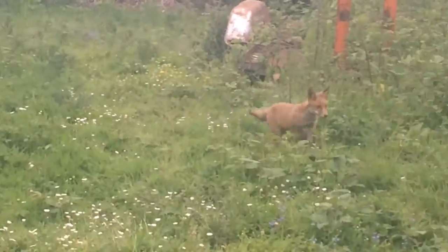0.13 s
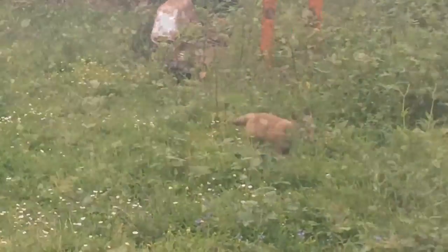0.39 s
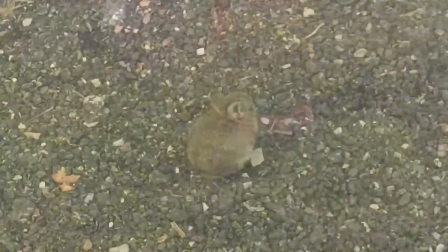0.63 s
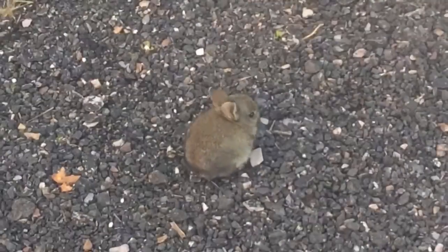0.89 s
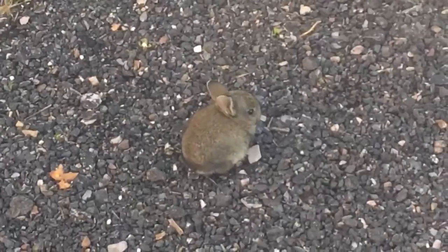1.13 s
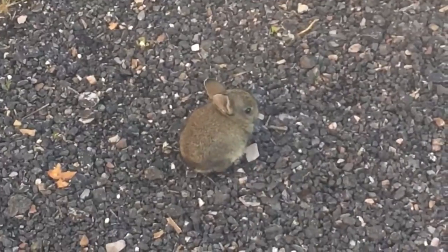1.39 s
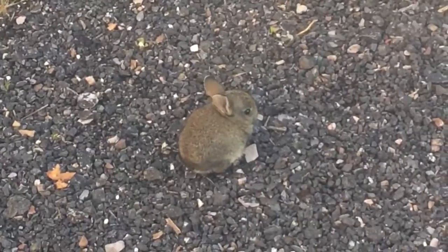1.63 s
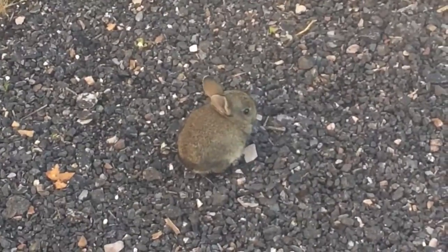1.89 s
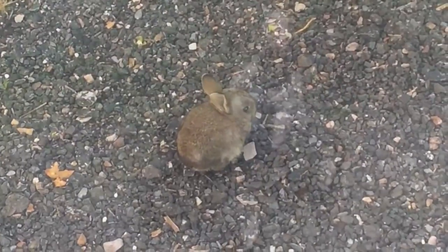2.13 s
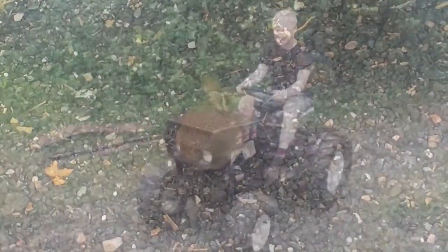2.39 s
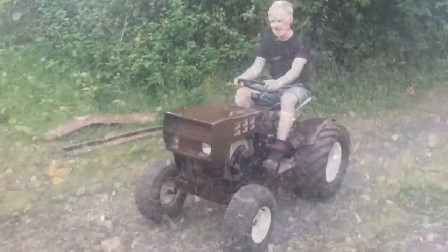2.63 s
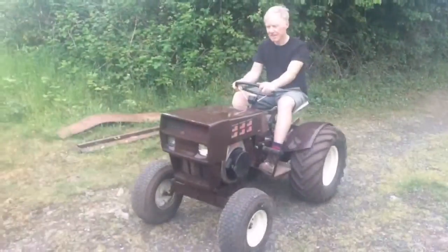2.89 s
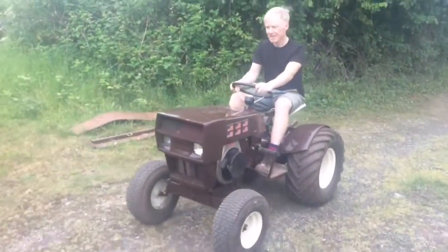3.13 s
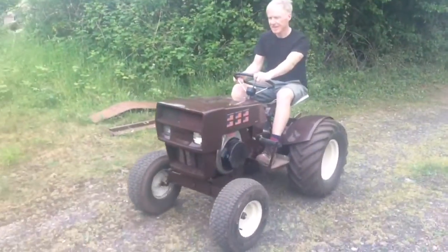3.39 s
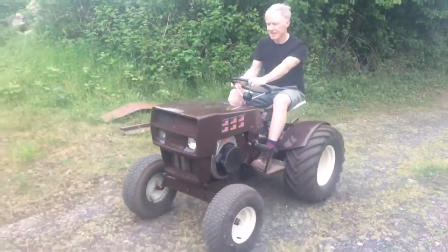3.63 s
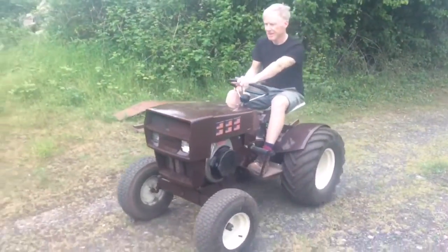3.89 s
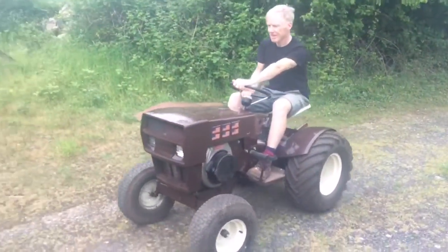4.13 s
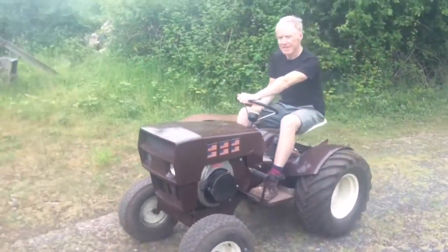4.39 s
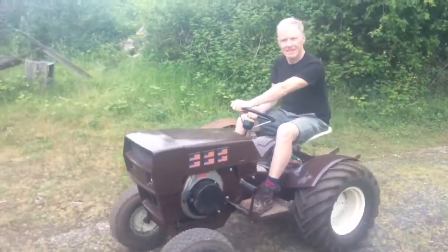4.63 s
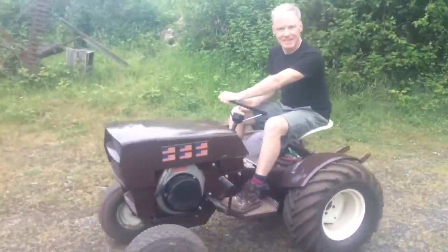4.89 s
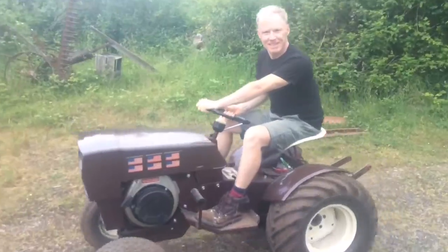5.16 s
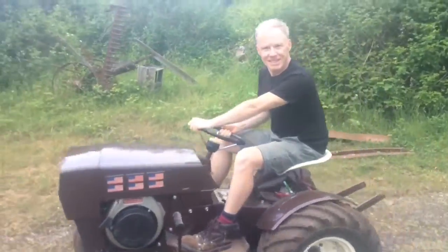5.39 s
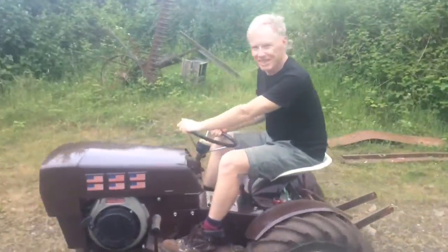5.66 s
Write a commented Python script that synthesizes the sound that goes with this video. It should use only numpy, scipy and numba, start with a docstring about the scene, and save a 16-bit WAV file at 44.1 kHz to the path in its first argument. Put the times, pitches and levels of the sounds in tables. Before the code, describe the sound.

First soft steps rub grass under faint wind, then a calmer yard with birds whistling and a camera motor ticking in threes. Suddenly, at two seconds, a much louder small diesel tractor takes over with steady rapid knocks, low exhaust pulses, chattering gears and loose steel jingles. Stones crack under a tyre and a panel clangs late. Close outdoor phone pickup, dry.

```python
"""Steps scuff the grass of a quiet garden over wind and far hiss, birds whistle, a lens motor ticks in threes.
Then a hard cut to a one-cylinder diesel garden tractor rolling past a few metres away: each firing knocks
the block, gas puffs ring the exhaust pipe, valve gear and timing gears clatter, a loose steel pin jingles,
stones crack under a tyre and a sheet panel clangs. Most sounds are clicks or noise bursts ringing
resonances; the whistles are bending sines."""
import sys
import numpy as np
from scipy import signal
from scipy.fft import rfft, irfft
from scipy.io import wavfile
from scipy.ndimage import uniform_filter1d
from numba import njit

SR = 44100
rng = np.random.default_rng(int(sys.argv[2]) if len(sys.argv) > 2 else 0)


def transcribe(u):
    """Save the signal u as a 16-bit wav file named by the first command-line argument.

    u: samples, shape (n,) or (channels, n), limited to [-1, 1]; the rate is SR.
    q: integer samples, one column per channel.
    """
    v = np.clip(np.atleast_2d(u).T, -1, 1)
    q = np.round(v * 32767).astype(np.int16)
    wavfile.write(sys.argv[1], SR, q)


def invert_db(level):
    """Linear amplitude ratio for a level in decibels (20 dB per decade), elementwise."""
    return 10 ** (np.asarray(level, dtype=float) / 20)


N = 254456
T = np.arange(N) / SR

HISS_CHANGE_S = 0.876  # the far hiss changes colour and drops
CUT_S = 1.976  # the tractor cuts in
SKIP_S, SKIPPED_S = 5.044, 0.02304  # a second cut jumps over a third of one engine cycle
FIRST_FIRING_S, CYCLE_S = 1.9906, 0.07  # nominal cycle length


def unit(x):
    """Scale to rms 1."""
    return x / np.sqrt(np.mean(x ** 2))


def curve(rows):
    """Interpolate the columns of (seconds, ..) rows, one value a sample."""
    s, *columns = np.transpose(rows)
    return [np.interp(T, s, column) for column in columns]


@njit
def svf(x, hz, width):
    """State-variable band-pass with gain 1 at its centre, which may move."""
    y, band, low = np.empty(len(x)), 0., 0.
    for i in range(len(x)):
        g, k = np.tan(np.pi * hz[i] / SR), width / hz[i]
        v = (band + g * (x[i] - low)) / (1 + g * (g + k))
        band, low, y[i] = 2 * v - band, low + 2 * g * v, k * v
    return y


def ring(x, hz, width):
    """One resonance at a fixed pitch; a wider one dies away faster."""
    return svf(x + 1e-18, hz * np.ones(N), 1. * width)


def modes(x, table):
    """Sum of resonances of alternating sign from (Hz, width in Hz, dB) rows."""
    return sum((-1) ** k * invert_db(db) * ring(x, hz, width) for k, (hz, width, db) in enumerate(table))


def low_pass(x, order, hz):
    """Butterworth low-pass."""
    return signal.sosfilt(signal.butter(order, hz, fs=SR, output="sos"), x)


def clicks(s, size):
    """One-sample pushes at times s."""
    i = np.round(np.asarray(s) * SR).astype(int)
    inside = (i >= 0) & (i < N)
    return np.bincount(i[inside], (size * np.ones(len(i)))[inside], N)


def bursts(s, size, tail_s):
    """Envelope that jumps at each time and dies away exponentially."""
    return signal.lfilter([1], [1, -np.exp(-1 / (tail_s * SR))], clicks(s, size))


def colour(x, table):
    """Shape a spectrum by (Hz, dB) points on a log frequency axis; rms 1."""
    hz, db = np.transpose(table)
    bins = np.arange(N // 2 + 1) * SR / N + 1
    gain = invert_db(np.interp(np.log(bins), np.log(hz), db))
    return unit(irfft(rfft(x) * gain, N))


def walk(rate):
    """Random levels held 1 / rate s and slewed; spread near 1."""
    k = int(SR / rate)
    held = np.repeat(rng.standard_normal(N // k + 1), k)
    return 1.6 * uniform_filter1d(uniform_filter1d(held, k), k)[:N]


def wind():
    """Wind on the microphone: low band-passed noise whose level wanders."""
    # Each row: time in seconds, mean rumble level in dB.
    rumble_rows = [(0.0, -56), (0.06, -58), (0.136, -51), (0.18, -59.5), (0.45, -54.5), (0.56, -55),
                   (0.644, -55), (0.7, -63.5), (1.2, -69), (1.96, -64)]
    rumble = unit(ring(ring(rng.standard_normal(N), 70, 82), 67, 94))
    return rumble * invert_db(curve(rumble_rows)[0] + 2.1 * walk(25.37))


def hiss():
    """Far hiss: steady noise that changes colour and drops a little at HISS_CHANGE_S."""
    # Spectra of the hiss before and after the change. Each row: frequency in Hz, relative level per Hz in dB.
    earlier_spectrum = [(120, -29), (200, 1), (1200, -6), (1630, -5), (2100, -8.5), (3610, -11), (4100, -13),
                        (7180, -10.5), (15100, -27.5)]
    later_spectrum = [(120, -48), (200, -10), (267, -7), (303, -10), (614, -7), (709, -13), (749, -8.5),
                      (2100, -14), (3420, -13.5), (4650, -23), (6210, -12.5), (15100, -29.5)]
    air = rng.standard_normal(N)
    earlier = colour(air, earlier_spectrum) * invert_db(-63.5)
    later = colour(air, later_spectrum) * invert_db(-67.5)
    return np.where(T < HISS_CHANGE_S, earlier, later)


def scuffs(rise_s=0.005, fall_s=0.0046):
    """Steps rub the grass: sparse grit rings hollow resonances under short swells."""
    # Hollow tone of the scuffs. Each row: frequency in Hz, width in Hz, relative level in dB.
    grass_modes = [(411, 23, 9), (733, 99, 6), (1077, 50, -1), (1490, 170, -2), (1800, 140, -5)]
    # Rubs of the foot. Each row: start in seconds, length in seconds, level in dB.
    rubs = [(0.02, 0.029, -54), (0.111, 0.028, -45.5), (.224, 0.023, -51.5), (0.266, .027, -52.5),
            (.314, .015, -52.5), (.355, .05, -58.5), (0.487, 0.0062, -42), (0.512, 0.015, -55),
            (.575, .015, -74)]
    grit = (rng.random(N) < 0.15) * rng.standard_normal(N)
    rustle = unit(modes(grit, grass_modes) + 0.37 * ring(ring(grit, 1060, 1500), 770, 1600))
    swell = 0
    for start, length, db in rubs:
        slope = np.minimum((T - start) / rise_s, (start + length - T) / fall_s)
        swell = swell + invert_db(db) * np.exp(np.minimum(0, slope))
    return rustle * swell


def lens_motor(step_rate=30):
    """Each motor step gives three clicks that ring a small housing, softer before the hiss changes."""
    # Clicks of one motor step. Each row: delay in seconds, mean push in dB after the hiss changes.
    step_ticks = [(.0020, -32), (0.012, -28), (0.018, -49)]
    steps = np.arange(60) / step_rate
    chance_db = 0.9 * rng.standard_normal((len(steps), len(step_ticks)))
    softer_db = 4.4 * (steps < HISS_CHANGE_S)
    ticks = sum(clicks(steps + lag, invert_db(db + c - softer_db)) for (lag, db), c in zip(step_ticks, chance_db.T))
    return ring(ring(ticks, 3300, 900), 3300, 900)


def birds(echo_db=-13.5, t60_s=0.71, warble_hz=25):
    """Near-sine whistles that bend smoothly, with a leafy echo of decaying noise."""
    # One list per whistle. Each row: time in seconds, pitch in Hz, mean level in dB.
    whistles = [
        [(0.59, 3610, -67), (0.646, 3669, -61), (0.765, 3630, -74)],
        [(1.117, 4660, -72), (1.13, 4838, -64), (1.148, 5080, -73)],
        [(1.235, 1600, -71), (1.25, 1680, -61.5), (1.33, 1780, -61), (1.345, 1800, -72), (1.36, 1870, -61),
         (1.39, 1890, -60), (1.435, 1860, -55), (1.47, 1750, -52), (1.508, 1595, -64)],
        [(1.584, 2093, -51), (1.634, 2507, -43.5), (1.646, 2530, -50), (1.662, 2093, -45)],
        [(1.668, 2110, -47), (1.685, 2300, -47), (1.712, 2441, -47.5), (1.765, 2060, -49)],
        [(1.765, 2150, -54), (1.79, 2050, -60), (1.82, 1790, -65)],
        [(1.94, 1571, -70), (1.95, 1758, -62), (1.976, 1590, -59)],
    ]
    song = 0
    for number, call in enumerate(whistles):
        hz, db = curve(call)
        hoarse = 5 if number == 5 else 1  # the sixth note warbles more
        hz = uniform_filter1d(hz, size=700) + warble_hz * walk(400) * hoarse
        edge = np.clip(np.minimum(T - call[0][0], call[-1][0] - T) / 0.0036, 0, 1)
        tone = np.sin(2 * np.pi * np.cumsum(hz) / SR)
        song = song + np.sqrt(2) * edge * invert_db(db + 2.35 * walk(90)) * tone
    tail = rng.standard_normal(SR // 2) * invert_db(-60 * T[:SR // 2] / t60_s)
    echo = signal.fftconvolve(song, tail / np.sqrt(np.sum(tail ** 2)))[:N]
    return song + invert_db(echo_db) * echo


def firings():
    """Firing times one cycle apart; the second cut brings the next one forward."""
    # The governor hunts a little. Each row: valid from in seconds, cycle length in seconds.
    speed = [(1.9, .07025), (2.26, .07004), (2.75, .06991), (3.52, .07), (3.73, .06982), (4.15, .07014),
             (5.04, .06984)]
    start, cycle = np.transpose(speed)
    s = [FIRST_FIRING_S]
    while s[-1] < T[-1]:
        then = s[-1] + cycle[np.searchsorted(start, s[-1]) - 1]
        s.append(then - SKIPPED_S * (s[-1] < SKIP_S < then))
    return np.array(s)


def crank():
    """Share of the nominal engine cycle since the last firing."""
    s = np.r_[FIRST_FIRING_S - CYCLE_S, firings()]
    last = s[np.maximum(np.searchsorted(s, T, "right") - 1, 0)]
    return (T - last) / CYCLE_S


def exhaust(level_db, top_db, rumble_db=-11.0):
    """Nearly the same puffs every cycle ring the narrow pipe modes over a low noise of turbulence."""
    # Gas events of a cycle. Each row: seconds after firing, mean relative push (negative = suction).
    puffs = [(0.014, 0.19), (0.0183, 0.38), (0.0297, 1), (.0366, -.73), (0.0633, 0.4)]
    # Exhaust pipe modes. Each row: frequency in Hz, width in Hz, relative gain with sign.
    pipe_modes = [(69.4, 8.3, 18.5), (107.6, 11.6, 42.5), (156, 7.15, -75.5), (212.5, 8.6, 34.5)]
    s = np.r_[FIRST_FIRING_S - CYCLE_S * np.arange(1, 4), firings()]
    chance_db = rng.standard_normal((len(s), len(puffs)))
    gas = 0
    for (lag, push), c in zip(puffs, chance_db.T):
        jumped = (s < SKIP_S) & (s + lag > SKIP_S)  # puffs lost in the second cut
        gas = gas + clicks(s + lag, push * invert_db(c) * ~jumped)
    *lower, top = (gain * ring(gas, hz, width) for hz, width, gain in pipe_modes)
    tone = sum(lower) + invert_db(top_db) * top
    tone = tone / np.std(tone[T > CUT_S])
    rumble = unit(ring(ring(rng.standard_normal(N), 61, 320), 61, 320))
    return invert_db(level_db) * (tone + invert_db(rumble_db) * rumble)


def clatter(level_db, phase, spread_db=1.8, repeat=0.66):
    """Tappets, gears and panels rattle in short bursts, each family on its own, bunched where valves move."""
    # Colour of the din. Each row: frequency in Hz, relative level per Hz in dB.
    din_spectrum = [(24, -24), (40, -1.5), (165, -11), (227, 0), (322, -14.5), (613, -8.5), (1010, 1.5),
                    (1430, -6), (1870, -17), (2070, -14), (2590, -18.5), (3320, -15.5), (5180, -27.5),
                    (11500, -53), (15100, -58)]
    # Busier valve gear. Each row: share of the cycle, extra level in dB, decay as share of the cycle.
    valve_moves = [(0.028, 11, 0.24), (0.261, -8.5, 0.48), (0.761, -11.5, .15)]
    # Families of parts. Each row: low edge in Hz, high edge in Hz, taps per second, tail in seconds,
    # steady wash in dB relative to the taps.
    families = [(284, 1014, 700, 0.0053, 7), (1083, 2410, 1100, 0.0033, 10.5),
                (2720, 4000, 220, 0.0038, 3.5), (4840, 21000, 370, 0.011, -33)]
    busy = 1 + sum(invert_db(db) * np.exp(-((phase - at) % 1) / fall) for at, db, fall in valve_moves)
    # the valve gear does much the same every cycle: part of the din repeats
    habit, fresh = rng.standard_normal((2, N))
    same = habit[(phase * CYCLE_S * SR).astype(int) % N]
    din = colour(repeat * same + np.sqrt(1 - repeat ** 2) * fresh, din_spectrum)
    out = 0
    for low_hz, high_hz, rate, tail_s, wash_db in families:
        taps = T[rng.random(N) < rate / SR]
        taps_db = spread_db * rng.exponential(size=len(taps))
        shake = unit(bursts(taps, invert_db(taps_db), tail_s)) + invert_db(wash_db)
        band = signal.sosfilt(signal.butter(2, [low_hz, high_hz], "band", fs=SR, output="sos"), din)
        out = out + band * unit(shake)
    return invert_db(level_db) * out * busy


def gears(level_db, rate=130, wash_db=-6):
    """Timing gears chatter all through the cycle: random taps per second of noise ring their housing."""
    # Housing resonance: frequency in Hz, width in Hz.
    housing = (3266, 400)
    teeth = T[rng.random(N) < rate / SR]
    shake = unit(bursts(teeth, 1, 0.0016)) + invert_db(wash_db)
    return invert_db(level_db) * unit(ring(ring(shake * rng.standard_normal(N), *housing), *housing))


def knock(side_db, uneven_db=0.6, ping_uneven_db=2.5):
    """Needle lift, ignition and piston slap strike the block; uneven burning crackles after them."""
    # Blows of one knock. Each row: seconds after firing, mean relative push with sign.
    knock_blows = [(-.0024, 0.46), (-.0017, -0.93), (.0010, 1.0)]
    # Block and bonnet modes. Each row: frequency in Hz, width in Hz, gain with sign.
    block_modes = [(619.6, 36, 0.95), (853, 111, -0.46), (850, 420, 0.19), (1172, 78, -0.72), (1437, 70, 1),
                   (1680, 27, -0.43), (2050, 380, -0.053)]
    # Side panel, facing the listener late in the pass. Each row: frequency in Hz, width in Hz, gain in dB.
    side_modes = [(495, 219, -0.5), (1580, 67, 3.5)]
    # Combustion chamber ring. Each row: frequency in Hz, width in Hz, gain in dB.
    chamber_modes = [(3150, 630, -7), (3813, 222, 0)]
    # Coming nearer and turning side-on. Each row: time in seconds, mean force on the block in dB,
    # mean force of the chamber ring in dB.
    load = [(2.0, 22, -11), (2.9, 22, -6), (3.4, 22, -9.5), (4.0, 23, -7), (4.5, 22, -15),
            (5.0, 23.5, -14.5), (5.77, 23, -27)]
    # Firings that stand out. Each row: time in seconds, extra knock in dB, extra chamber ring in dB.
    hard_firings = [(3.251, 0.8, 12.5), (5.049, -2.5, -9), (5.188, 2.5, 8.5)]
    s = firings()
    db, ping_db = (column[np.minimum(s * SR, N - 1).astype(int)] for column in curve(load))
    luck = rng.standard_normal((len(s), 2))
    db, ping_db = db + uneven_db * luck[:, 0], ping_db + ping_uneven_db * luck[:, 1]
    for at, extra_db, extra_ring_db in hard_firings:
        k = np.argmin(abs(s - at))
        db[k], ping_db[k] = db[k] + extra_db, ping_db[k] + extra_ring_db

    jitter_s, scatter_db, crackle_s, crackle_db = 0.00005, 0.6, 0.007, -31
    blows = 0
    for lag, push in knock_blows:
        late, uneven = rng.standard_normal((2, len(s)))
        blows = blows + clicks(s + lag + jitter_s * late, push * invert_db(db + scatter_db * uneven))
    start = s + knock_blows[0][0]
    burn = rng.standard_normal(N)
    force = blows + invert_db(crackle_db) * burn * bursts(start, invert_db(db), crackle_s)

    front, a, b, bonnet, *rest = (gain * ring(force, hz, width) for hz, width, gain in block_modes)
    # front panel and bonnet turn away as the side comes round
    side = invert_db(side_db)
    body = (1 - 1.5 * side) * front + (1 - 0.68 * side) * bonnet + a + b + sum(rest)
    body = body + side * modes(force, side_modes)
    flash = burn * bursts(start, invert_db(ping_db), 0.0058)
    # contacts last a fraction of a millisecond, so the far treble is missing
    return low_pass(body + modes(flash, chamber_modes), 2, 5200)


def jingle(rate=160, bounce_db=-5, settle_s=0.02, idle_db=-54, uneven_db=2.0):
    """The steel pin is thrown by the crank turns, harder or softer, and chatters while it settles."""
    # Pin modes. Each row: frequency in Hz, width in Hz, gain in dB.
    pin_modes = [(2107, 66, 10.5), (3720, 340, 7), (6120, 156, 3), (8726, 92, 0), (11310, 93, 1.5),
                 (12930, 110, -5.5), (13750, 100, -17), (6660, 2400, -20.5)]
    # Loudest strikes. Each row: time in seconds, force in dB.
    strikes = [(2.0384, -29.5), (2.181, -27), (2.3555, -26.5), (2.4977, -29), (2.809, -28.5), (3.2563, -28),
               (3.2992, -24), (3.375, -28), (3.4386, -26), (3.894, -25), (4.0684, -31), (4.2083, -23),
               (5.014, -20), (5.1698, -24.5), (5.3789, -33)]
    # How freely the pin rattles between them. Each row: time in seconds, mean force in dB.
    looseness = [(2.0, -31), (2.5, -37), (2.6, -35), (2.8, -32), (3.0, -40), (3.2, -38.5), (3.4, -33.5),
                 (3.52, -40), (3.62, -27), (3.8, -46), (4.0, -39), (4.15, -32), (4.47, -38), (4.6, -32.5),
                 (4.8, -35), (4.92, -26.5), (5.1, -41.5), (5.4, -24), (5.53, -35), (5.68, -26)]
    # Each crank turn can throw the pin, this many seconds after the firing.
    throws = (.015, .050)
    turns = (firings()[:, None] + throws).ravel()
    luck = np.clip(rng.standard_normal(len(turns)), -3, 1.5)
    turns_db = np.interp(turns, *np.transpose(looseness)) + uneven_db * luck
    s, db = np.c_[np.transpose(strikes), [turns, turns_db]]
    unrest = invert_db(bounce_db) * bursts(s, invert_db(db), settle_s) + invert_db(idle_db)
    bounces = np.flatnonzero(rng.random(N) < rate / SR)  # rate is bounces per second
    chatter = bursts(bounces / SR, unrest[bounces] * rng.random(len(bounces)), 0.0068)
    contact = bursts(s, invert_db(db), 0.0065) + chatter
    force = contact * rng.standard_normal(N)
    return sum(invert_db(gain_db) * ring(force, hz, width) for hz, width, gain_db in pin_modes)


def stone_cracks(contact_hz=1700):
    """Stones crack under a tyre: a push rings a bright mode and a low thump, softened by the contact."""
    # Each row: time in seconds, push in dB, pitch of the main mode in Hz.
    stones = [(2.7674, 20, 1260), (5.688, 14, 1300)]
    cracks = 0
    for at, db, hz in stones:
        # (Hz, width in Hz, dB before the softening)
        stone_modes = [(hz, 200, 8), (3300, 1000, -24), (162, 90, 10), (5500, 2500, -26), (600, 500, -8)]
        cracks = cracks + modes(clicks([at], invert_db(db)), stone_modes)
    return -low_pass(cracks, 1, contact_hz)


def panel_clangs():
    """A sheet panel clangs near 2 kHz: short noisy scrapes ring two close resonances in a row."""
    # Each row: time in seconds, force in dB.
    clang_hits = [(4.385, -5), (4.735, -7), (4.835, -2.5), (5.012, 1), (5.0608, -3), (5.166, 1.3)]
    s, db = np.transpose(clang_hits)
    scrape = bursts(s, invert_db(db), 0.0079) * rng.standard_normal(N)
    return ring(ring(scrape, 2036, 120), 2036.7, 120)


def scene():
    """Garden first, tractor after the cut."""
    # Driving by. Each row: time in seconds, exhaust level in dB, relative top pipe mode in dB,
    # side panel in dB, clatter level in dB.
    drive = [(1.99, -31.5, 6.5, -16, -30), (2.03, -27.5, 1, -24, -30), (4.18, -26.5, 0, -14, -31),
             (4.8, -27.5, -0.5, -5, -28.5), (4.97, -24, -8, -4.5, -28), (5.19, -29.5, -0.5, -5, -28),
             (5.58, -23.5, -7, -6.5, -28), (5.77, -25.5, -6.5, -9, -26)]
    garden = wind() + hiss() + scuffs() + lens_motor() + birds()
    pipe_db, top_db, side_db, clatter_db = curve(drive)
    engine = exhaust(pipe_db, top_db) + clatter(clatter_db, crank()) + gears(clatter_db - 16) + knock(side_db)
    tractor = engine + jingle() + stone_cracks() + panel_clangs()
    cut = np.clip((T - CUT_S) / 0.0012, 0, 1)
    return (cut * tractor + (1 - cut) * garden)[None]


def top_cut(x):
    """Nothing passes above the cut-off."""
    return signal.sosfilt(signal.butter(12, 15220, fs=SR, output="sos"), x)


def record(dry):
    """A phone microphone without the deepest bass and the top treble."""
    x = signal.sosfilt(signal.butter(2, 35, "high", fs=SR, output="sos"), dry)
    x = low_pass(x, 6, 14200)
    return top_cut(x)


dry = scene()
out = record(dry)
transcribe(out)
```